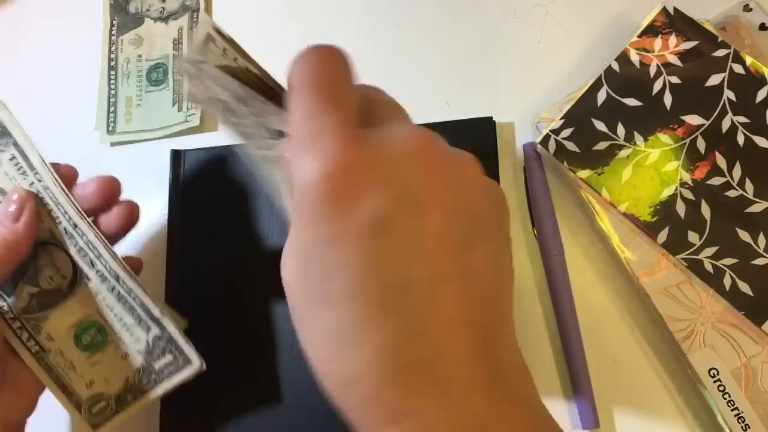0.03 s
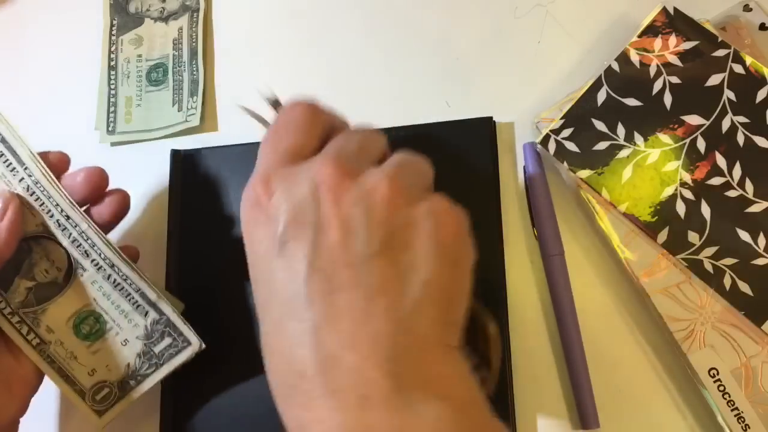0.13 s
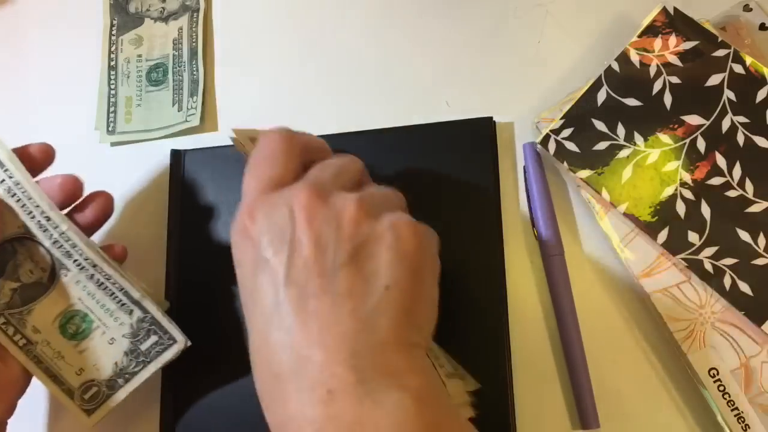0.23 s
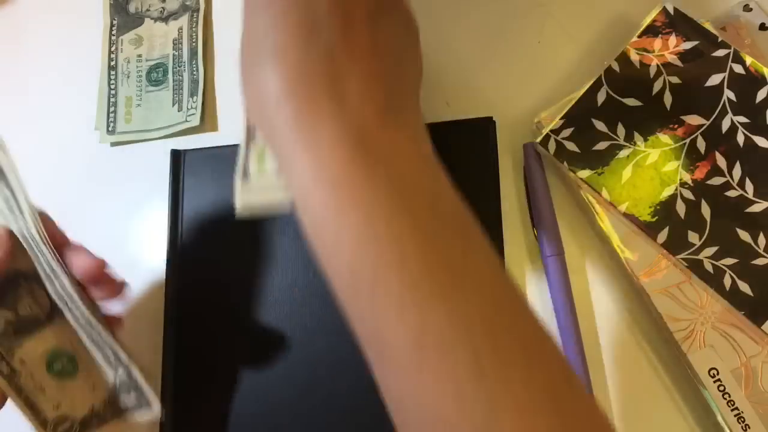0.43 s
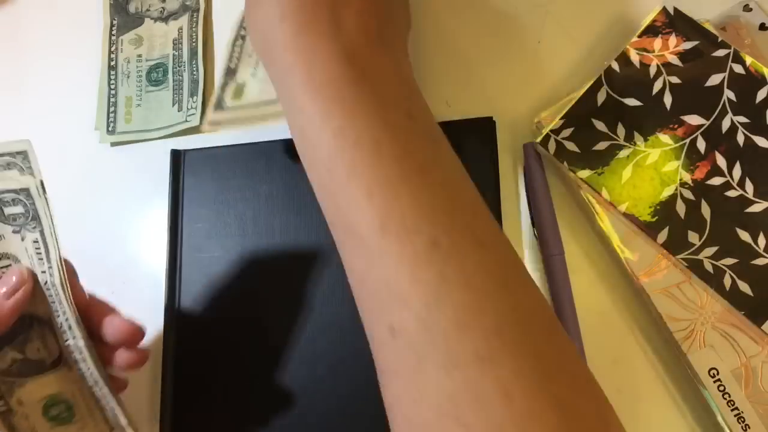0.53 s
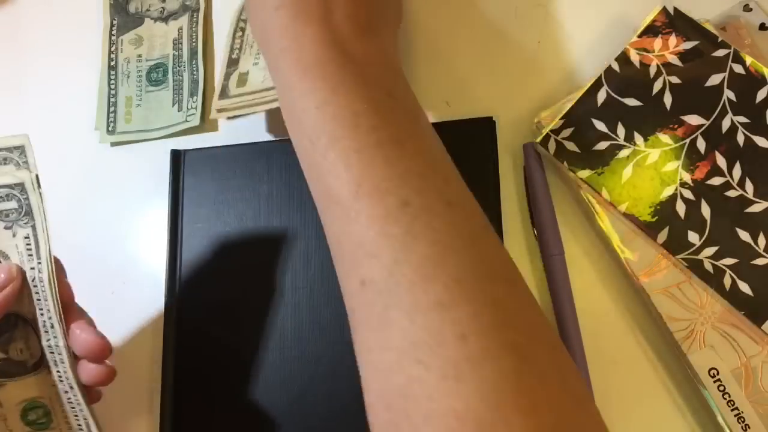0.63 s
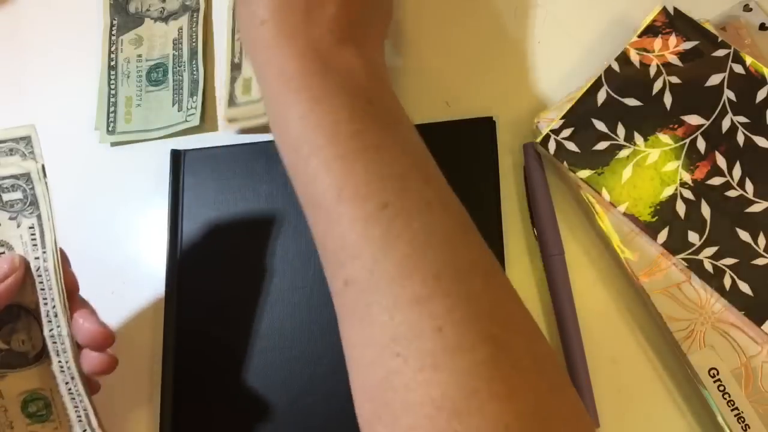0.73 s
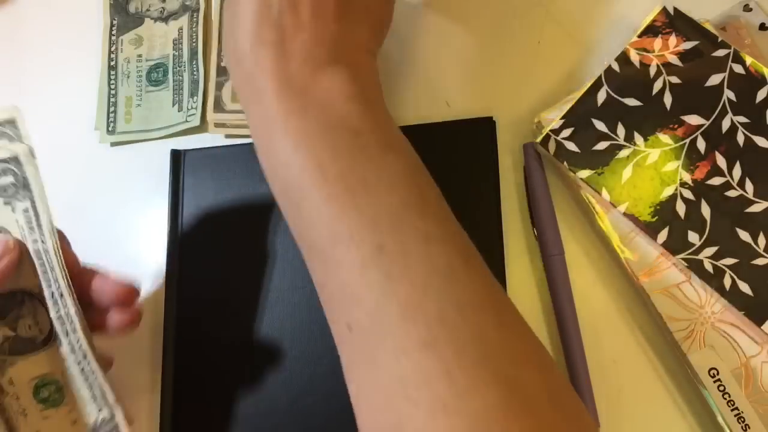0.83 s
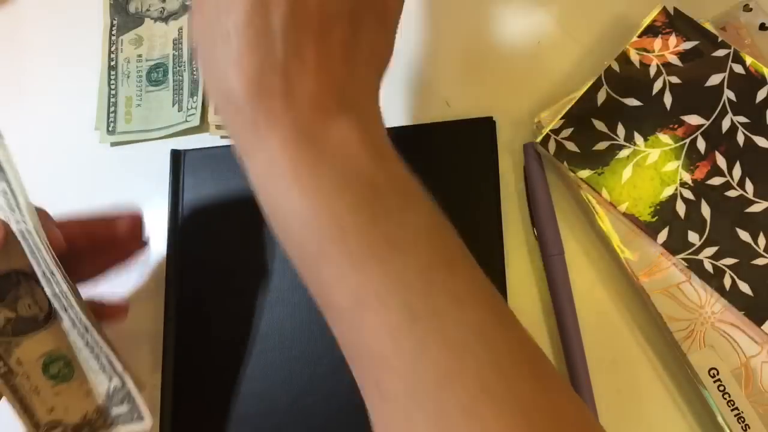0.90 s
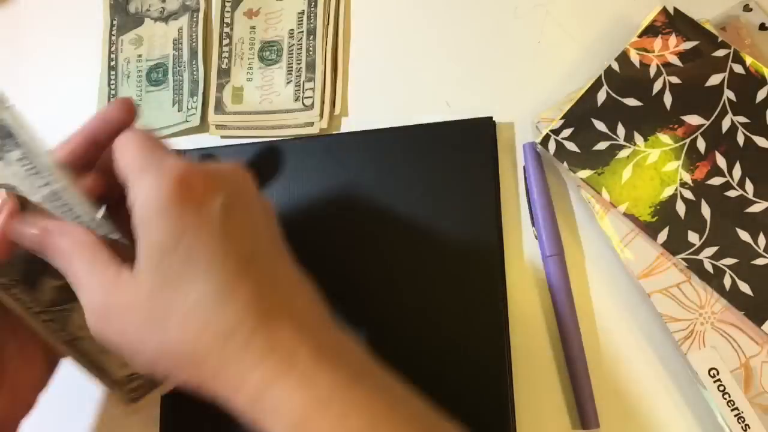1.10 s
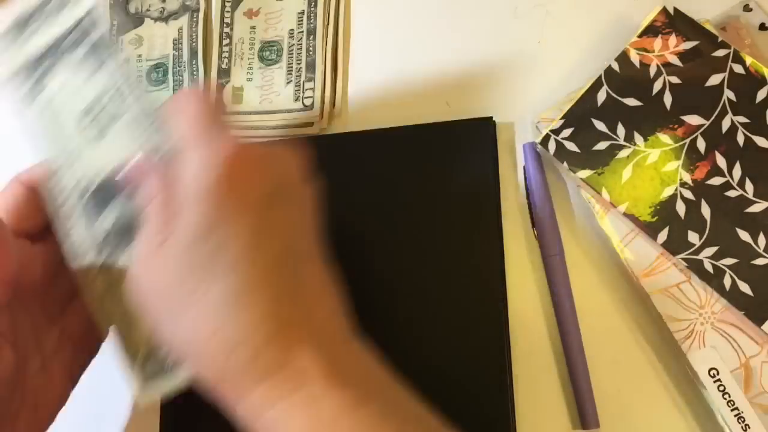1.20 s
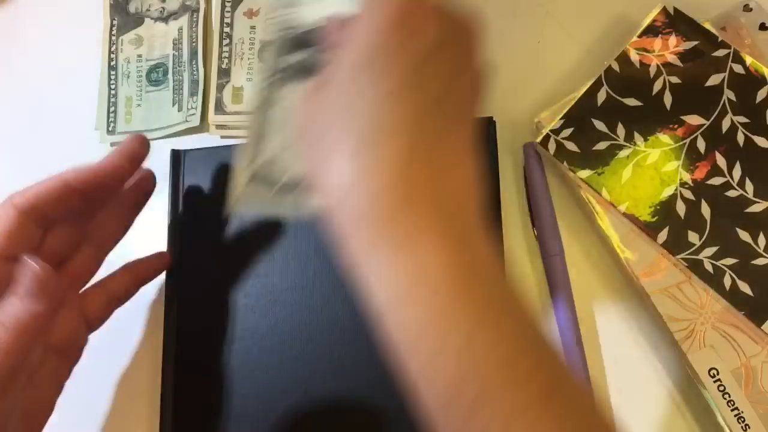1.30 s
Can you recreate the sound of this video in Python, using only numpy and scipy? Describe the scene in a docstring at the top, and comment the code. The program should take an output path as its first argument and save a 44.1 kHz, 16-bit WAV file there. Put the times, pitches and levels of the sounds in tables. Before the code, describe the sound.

Paper banknotes are handled at a table: a quick swish and sharp double snap early on, then small crease ticks, soft pats on the pile and faint sliding, close-miked in a small quiet room.

```python
"""A banknote snaps taut as it is pulled clear by hand over a table: pulses and flutter, with an echo off the table.
Creases tick, the pile is patted softly, and a low thump lies under the second snap: the same burst model.
Paper slides and swishes on paper: coloured grains and hiss whose level flickers.
A short diffuse tail, rumble, hiss and a wavering low hum make the small, quiet room."""
import sys
import numpy as np
from scipy import signal
from scipy.fft import rfft, irfft
from scipy.io import wavfile

SR = 44100
rng = np.random.default_rng(int(sys.argv[2]) if len(sys.argv) > 2 else 0)


def persist_wave(psi):
    """Save psi, clipped to +-1, as 16-bit WAV."""
    counts = np.round(np.clip(psi, -1, 1) * 32767).astype(np.int16)
    wavfile.write(sys.argv[1], SR, np.atleast_2d(counts).T)


N = 59535
T = np.arange(N) / SR  # seconds
RING_Q = 4.3  # of the ring in each contact and swish


def from_db(db):
    """Logarithmic level: decibels to amplitude gain."""
    return 10 ** (np.asarray(db) / 20)


def rms_one(x):
    """Normalisation of power: scale to rms 1."""
    return x / np.sqrt(np.mean(x ** 2) + 1e-20)


def gain_at(colour, hz, tilt_db=0):
    """Spectral envelope: a (Hz, dB) table read along octaves, tilted in dB per octave about 1 kHz."""
    table_hz, table_db = np.transpose(colour)
    octave = np.log2(np.maximum(hz, 1))
    tilt = tilt_db * (octave - np.log2(1000))
    return from_db(np.interp(octave, np.log2(table_hz), table_db) + tilt)


def coloured(x, colour, tilt_db=0):
    """Linear filtering: shape the spectrum of a steady noise, then scale to rms 1."""
    gain = gain_at(colour, np.fft.rfftfreq(N, 1 / SR), tilt_db)
    return rms_one(irfft(rfft(x) * gain, N))


def causal(gain):
    """Minimum phase: folding the cepstrum gives the most compact causal pulse with this spectrum."""
    cepstrum = irfft(np.log(gain + 1e-9))
    half = len(cepstrum) // 2
    cepstrum[1:half] *= 2
    cepstrum[half + 1:] = 0
    return irfft(np.exp(rfft(cepstrum)))


def peak(x, hz, db, q):
    """Second-order resonance: a peak (dB above 0) or a hollow (dB below 0)."""
    a = from_db(db / 2)
    w = 2 * np.pi * hz / SR
    k = np.sin(w) / (2 * q)
    numerator = [1 + k * a, -2 * np.cos(w), 1 - k * a]
    denominator = [1 + k / a, -2 * np.cos(w), 1 - k / a]
    return signal.lfilter(numerator, denominator, x)


# Spectrum of the room rumble and hiss. Each row: frequency in Hz, relative level in dB.
FLOOR_COLOUR = [(18, -40), (26, -14), (32, -11.5), (45, 0.5), (75, 3), (98, -3.5), (117, 8), (135, 1.5),
                (195, -1.5), (225, -18.5), (270, -14), (300, -23), (380, -21.5), (520, -23.5), (670, -20),
                (850, -28), (1550, -32.5), (1800, -27), (2100, -33), (3000, -41), (6000, -51),
                (12000, -52.5)]
FLOOR_DB = -48.5
HUM_HZ, HUM_DB = 121.2, -59.5  # level before the waver
HUM_WAVER = 0.4  # rms depth as a share of the amplitude


def background():
    """Stationary noise and amplitude modulation: rumble and hiss with a wavering hum."""
    waver = coloured(rng.standard_normal(N), [(1, -12), (4, 0), (9, 0), (30, -40)])  # rates (Hz, dB)
    hum = np.sqrt(2) * np.sin(2 * np.pi * (HUM_HZ * T + rng.random()))
    hum = hum * (1 + HUM_WAVER * waver)
    floor = coloured(rng.standard_normal(N), FLOOR_COLOUR)
    return from_db(FLOOR_DB) * floor + from_db(HUM_DB) * hum


ROOM_T60_S, ROOM_DELAY_S = 0.18, 0.0066
ROOM_DB, ROOM_DULL_HZ = -20, 3700  # energy of the tail's impulse response; its low-pass corner


def room(x):
    """Diffuse reverberation: convolution with a short, dull, exponentially decaying noise."""
    tail = rng.standard_normal(N) * from_db(-60 * T / ROOM_T60_S) * (T > ROOM_DELAY_S)
    tail = signal.sosfilt(signal.butter(1, ROOM_DULL_HZ, fs=SR, output="sos"), tail)
    return from_db(ROOM_DB) * signal.fftconvolve(x, tail / np.linalg.norm(tail))[:N]


# Stick and slip of sliding paper, as a spectrum of flicker. Each row: rate in Hz, relative level in dB.
FLICKER_RATES = [(10, 15.5), (80, 6.5), (200, -19), (600, -26.5)]
FLICKER_DB = 2.0  # rms depth
GRAINS_PER_S, GRAIN_SPREAD_DB = 5000, 2.5  # mean rate; scale of the random excess over the smallest grain
GRAIN_SHARE = 0.68  # of the power; the rest is hiss


def friction(colour, tilt_db=0):
    """Stick-slip friction: fibres catch and let go as dense uneven grains in a flickering hiss."""
    excess = np.minimum(rng.exponential(1, N), 4)
    sizes = from_db(GRAIN_SPREAD_DB * excess) * rng.choice([-1, 1], N)
    grains = rms_one(sizes * (rng.random(N) < GRAINS_PER_S / SR))
    hiss = rng.standard_normal(N)
    flicker = from_db(FLICKER_DB * coloured(rng.standard_normal(N), FLICKER_RATES))
    rub = np.sqrt(GRAIN_SHARE) * grains + np.sqrt(1 - GRAIN_SHARE) * hiss
    return coloured(flicker * rub, colour, tilt_db)


# Friction of paper on paper, before the paper resonances. Each row: time in seconds, level in dB.
SLIDE_LEVELS = [(0, -57.5), (.08, -66.5), (.18, -71.5), (.30, -79), (.35, -59.5), (.45, -61), (.473, -60),
                (.485, -64.5), (.51, -59.5), (.55, -67.5), (.59, -71.5), (.63, -69), (.66, -60), (.74, -62),
                (.78, -61), (.82, -62.5), (.86, -54), (.882, -63.5), (.90, -79), (1.0, -84), (1.12, -78.5),
                (1.165, -61.5), (1.26, -69), (1.32, -56.5), (1.35, -50)]
# Spectrum of the slide. Each row: frequency in Hz, relative level in dB.
SLIDE_SPECTRUM = [(200, -13.5), (600, -18), (1200, -0.5), (2700, 2), (4200, -0.5), (6000, -3.5),
                  (9500, -7.5), (12500, -7)]


def sliding():
    """Sustained friction under an envelope: the faint rub of notes in the hand and on the pile."""
    s, db = np.transpose(SLIDE_LEVELS)
    return from_db(np.interp(T, s, db)) * friction(SLIDE_SPECTRUM)


# A note is drawn quickly over another; levels are before the bass cut and paper resonances.
# Each row: start in seconds, rise in seconds, fall time in seconds, peak level in dB,
# tilt in dB per octave, ring in Hz, ring gain in dB.
SWISH_DRAWS = [(0.029, .05, 0.22, -60.5, 1.5, 2450, 18.5), (0.188, 0.037, 0.024, -35.5, 2.5, 620, 20.5),
               (0.237, 0.0027, 0.083, -30.5, 0, 1100, 6), (0.279, 0.016, 0.013, -41, 3.5, 8300, 5),
               (1.174, .06, 0.024, -47, 2, 9400, 6)]
# Spectrum of the swishes. Each row: frequency in Hz, relative level in dB.
SWISH_SPECTRUM = [(120, 3.5), (220, 7.5), (380, -6.5), (620, -8), (1200, -4), (2300, -8), (4200, -8.5),
                  (9000, -15.5), (11500, -17)]
SWISH_RISE_DB, SWISH_FALL_DB = 12, 26.5  # change over one rise time and one fall time
BASS_CUT_HZ = 120


def swishes():
    """Transient friction: draws swell and die away, each with one resonance of the bent sheet."""
    out = np.zeros(N)
    for s, rise, fall, db, tilt_db, ring_hz, ring_db in SWISH_DRAWS:
        late = T - s - rise  # seconds after the peak
        shape_db = np.minimum(SWISH_RISE_DB * late / rise, -SWISH_FALL_DB * late / fall)
        rub = rms_one(peak(friction(SWISH_SPECTRUM, tilt_db), ring_hz, ring_db, RING_Q))
        out += (T >= s) * from_db(db + shape_db) * rub
    return signal.sosfilt(signal.butter(2, BASS_CUT_HZ, "high", fs=SR, output="sos"), out)


CONTACT_S = 0.0012  # paper keeps fluttering this long before it dies away
DAMPING_POWER = 0.51  # how strongly decay time shortens with frequency


def crackle(t60, sharpness, size=4096, count=26):
    """Frequency-dependent damping: a pulse and a flutter that dies faster in the treble, evened in spectrum."""
    hz, t = np.fft.rfftfreq(size, 1 / SR), np.arange(size) / SR
    centres = np.geomspace(150, 16000, count)
    bands = [np.interp(hz, centres, row) for row in np.eye(count)]
    white = rfft(rng.standard_normal(size))
    flutter = 0
    for centre, band in zip(centres, bands):
        band_t60 = t60 * (centre / 1000) ** -DAMPING_POWER
        fade = from_db(-60 * np.maximum(t - CONTACT_S, 0) / band_t60)
        flutter = flutter + irfft(white * band) * fade / np.linalg.norm(fade)
    # the spectrum of a single pulse is 1 at every frequency
    both = np.sqrt(sharpness) + np.sqrt(1 - sharpness) * rfft(flutter)
    evening = sum(band / np.sqrt(np.average(np.abs(both) ** 2, weights=band)) for band in bands)
    return irfft(both * rfft(causal(evening))), hz


TABLE_ECHO = 0.42  # strength of the first reflection


def contacts(rows, colour):
    """Impulsive excitation and comb interference: brief contacts, each with a ring and a table echo."""
    out = np.zeros(2 * N)
    for s, db, tilt_db, ring_hz, ring_db, t60, sharpness, comb_hz, low_hz in rows:
        burst, hz = crackle(t60, sharpness)
        comb = np.abs(1 + TABLE_ECHO * np.exp(-2j * np.pi * hz / comb_hz))
        pulse = causal(comb * gain_at(colour, hz, tilt_db))
        burst = signal.fftconvolve(burst, pulse)[:len(burst)]
        burst = peak(burst, ring_hz, ring_db, RING_Q)
        burst = signal.sosfilt(signal.butter(4, low_hz, "high", fs=SR, output="sos"), burst)
        burst = burst / np.linalg.norm(burst) * np.sqrt(0.005 * SR)  # level is the rms over 5 ms
        start = int(s * SR)
        out[start:start + len(burst)] += from_db(db) * burst
    return out[:N]


# Creases flick over. Each row: start in seconds, level in dB, tilt in dB per octave, ring in Hz,
# ring gain in dB, T60 in seconds at 1 kHz, sharpness from 0 to 1 (the pulse's share against the flutter),
# comb spacing in Hz of the echo off the table, low edge in Hz.
CREASE_TICKS = [(.1893, -37.5, -3.5, 1570, 1.5, 0.022, 0.17, 1270, 250),
                (.2048, -31.5, -3, 1500, 2.5, 0.18, .03, 1480, 201),
                (.4735, -57.5, 8, 9400, 12, 0.025, .03, 1390, 1000),
                (.4990, -42, -.5, 1950, 7.5, 0.021, 0, 990, 1750),
                (.5635, -48.5, 0.5, 2080, 17, 0.069, .03, 1050, 200),
                (.571, -48, -3, 1920, 6.5, 0.039, 0.43, 1060, 199),
                (.5814, -44, 2.5, 2210, 15, 0.026, 0.01, 1030, 200),
                (.645, -52, -18, 4200, 11, 0.01, 0.15, 1110, 1590),
                (.6655, -56, -11, 4600, 9, .035, 0.25, 1350, 1500),
                (.8665, -57.5, -6.5, 3600, 18, 0.027, 0.46, 1180, 1200),
                (1.1725, -41.5, -2, 2960, 5, .026, 0.29, 1380, 153),
                (1.178, -51, 1.5, 600, -6, .025, 0.42, 1470, 300),
                (1.3342, -44.5, -1.2, 1560, 2, 0.051, .08, 1780, 700)]
# Spectrum of the ticks. Each row: frequency in Hz, relative level in dB.
TICK_SPECTRUM = [(200, -14.5), (700, -7), (1400, 1.5), (2100, -0.5), (5500, -3.5), (9500, -5.5),
                 (12500, -7)]


def ticks():
    """Sudden release of bending: creases tick as they flick over."""
    return contacts(CREASE_TICKS, TICK_SPECTRUM)


# Soft pats on the pile, the low thump under the second snap, and a duller tick;
# levels are before the paper resonances.
# Each row: start in seconds, level in dB, tilt in dB per octave, ring in Hz, ring gain in dB,
# T60 in seconds at 1 kHz, sharpness from 0 to 1, comb spacing in Hz of the table echo, low edge in Hz.
SOFT_CONTACTS = [(.2415, -36, -16, 210, 7, 0.015, 0, 1390, 146),
                 (.6892, -36, -1.5, 590, -4.5, 0.023, 0.49, 1370, 174),
                 (.7262, -47, 3, 3900, 3.5, 0.034, 0.1, 1950, 1640),
                 (.752, -48, 3.5, 804, 19, 0.1, 0.4, 1080, 200),
                 (.7990, -44.5, 1.5, 2100, 3, 0.033, 0.11, 1410, 111),
                 (.8308, -44.5, 2, 2153, 1.5, 0.03, 0.4, 1380, 109),
                 (1.179, -48.5, -6, 443, 6, 0.034, 0.35, 1400, 304),
                 (1.2275, -47, 2, 2180, 5, .03, 1, 1240, 510),
                 (1.2305, -42, 2, 1000, 7, 0.045, 0.04, 1220, 494),
                 (1.2385, -46.5, -2.5, 490, 1.5, 0.011, 0.58, 1390, 220)]
# Spectrum of the soft contacts. Each row: frequency in Hz, relative level in dB.
SOFT_SPECTRUM = [(120, -22), (250, 5), (380, -6.5), (560, 5), (750, -4.5), (1100, 0), (2100, 1),
                 (2700, -12), (4200, -13.5), (5500, -25), (16000, -37.5)]


def soft_contacts():
    """Damped impulse: soft pats on the pile, the low thump under the second snap, and a duller tick."""
    return contacts(SOFT_CONTACTS, SOFT_SPECTRUM)


# Resonances and hollows of paper held over the table top. Each row: frequency in Hz, gain in dB, Q.
PAPER_MODES = [(610, 4, 2), (765, -4.5, 8.2), (1070, 2.5, 2.7), (1840, -1.5, 7.86), (2920, 1, 5),
               (4460, 3.5, 8.7), (4630, -4.5, 9), (5980, 3, 9), (7280, -2.5, 13), (8350, 3, 9.2)]


def paper_resonances(x):
    """Modal filtering: the held sheet lifts some frequencies and hollows others."""
    for hz, db, q in PAPER_MODES:
        x = peak(x, hz, db, q)
    return x


# The note snaps taut; levels are before the paper resonances.
# Each row: start in seconds, level in dB, tilt in dB per octave, ring in Hz, ring gain in dB,
# T60 in seconds at 1 kHz, sharpness from 0 to 1, comb spacing in Hz of the table echo, low edge in Hz.
TAUT_SNAPS = [(.2217, -18.5, -1.48, 2680, 10, 0.013, 0.13, 1170, 186),
              (.2247, -23, 2, 620, 9, 0.017, 0.4, 1210, 153),
              (.2409, -22.5, -0.2, 2870, 1, 0.0084, 0.5, 1470, 1090)]
# Spectrum of the snaps. Each row: frequency in Hz, relative level in dB.
SNAP_SPECTRUM = [(100, -21.5), (240, -2), (350, -15.5), (600, 2.5), (820, -4.5), (1300, -3), (2800, -8),
                 (4300, -7.5), (5800, -13.5), (9000, -21.5), (11000, -31.5)]


def snaps():
    """Sudden tension: the sheet radiates short, loud bursts as it snaps taut."""
    return contacts(TAUT_SNAPS, SNAP_SPECTRUM)


def scene():
    """Superposition: all the paper sounds over the table, their reverberation and the background."""
    paper = paper_resonances(sliding() + swishes() + soft_contacts() + snaps())
    paper = paper + ticks()
    return (background() + room(paper) + paper)[None]


MIC_TOP_HZ, CUTOFF_HZ = 14000, 15900


def record(dry):
    """Band limitation: the microphone dulls the highest treble and the top is cut steeply."""
    dull = signal.sosfilt(signal.butter(2, MIC_TOP_HZ, fs=SR, output="sos"), dry)
    return signal.sosfilt(signal.ellip(10, 0.1, 70, CUTOFF_HZ, fs=SR, output="sos"), dull)


dry = scene()
out = record(dry)
persist_wave(out)
```